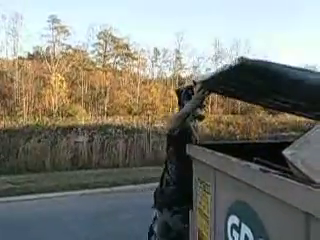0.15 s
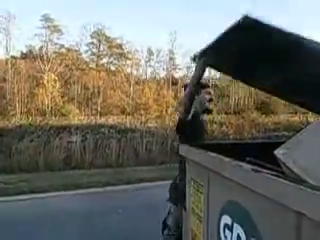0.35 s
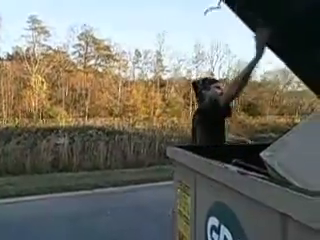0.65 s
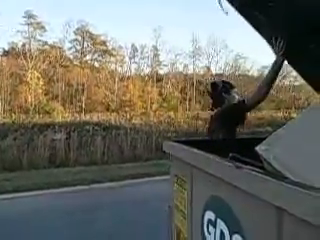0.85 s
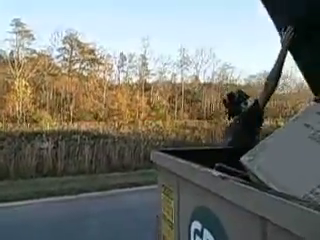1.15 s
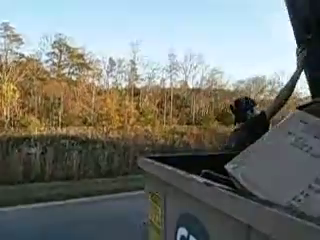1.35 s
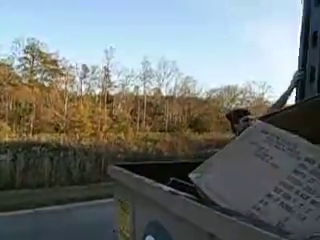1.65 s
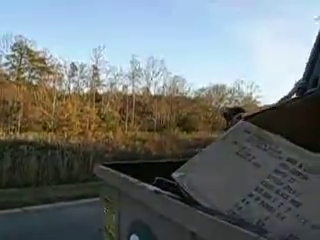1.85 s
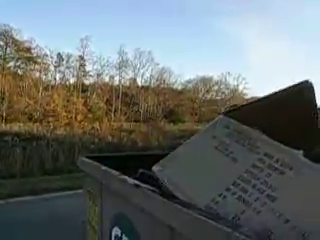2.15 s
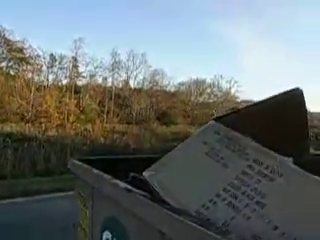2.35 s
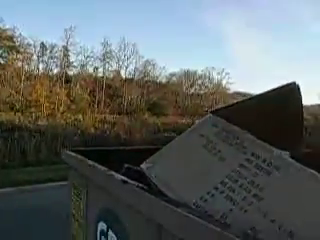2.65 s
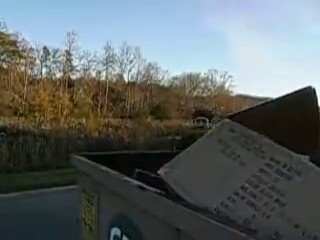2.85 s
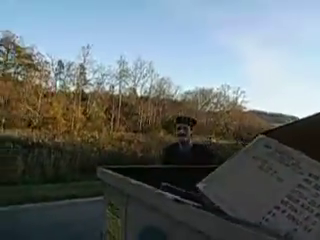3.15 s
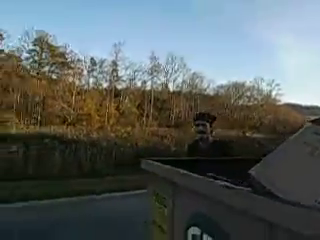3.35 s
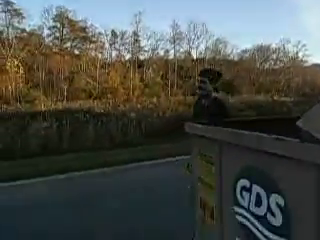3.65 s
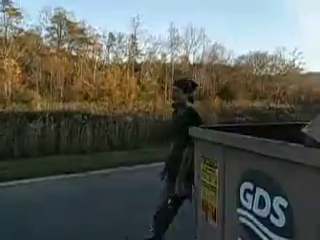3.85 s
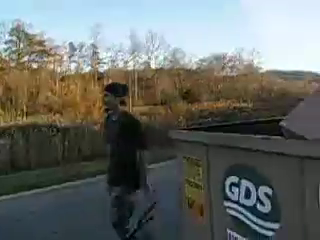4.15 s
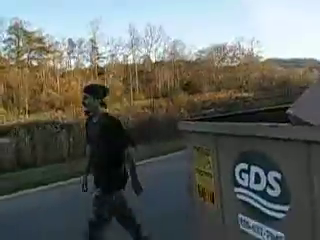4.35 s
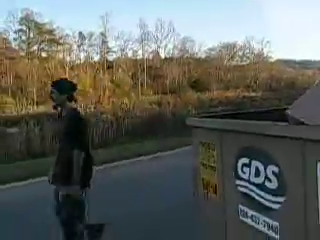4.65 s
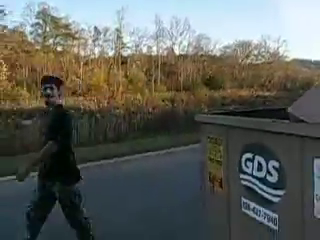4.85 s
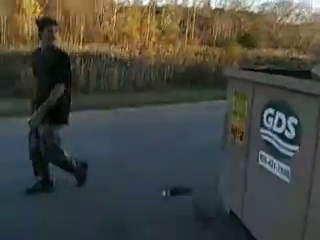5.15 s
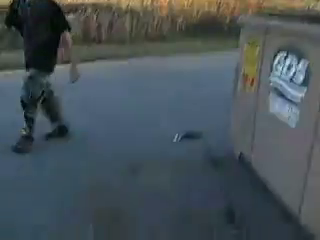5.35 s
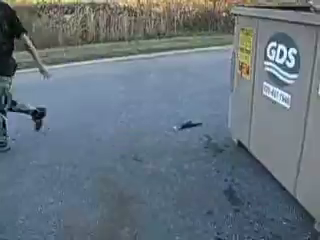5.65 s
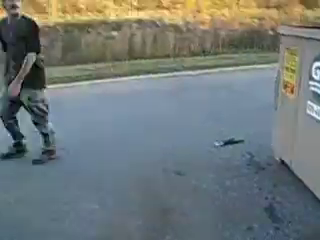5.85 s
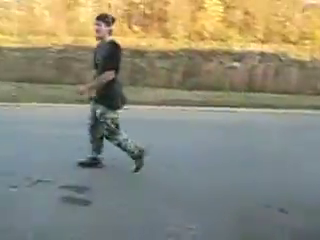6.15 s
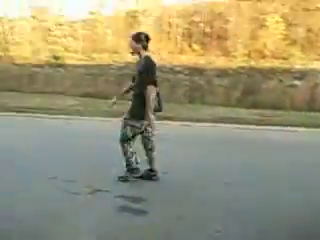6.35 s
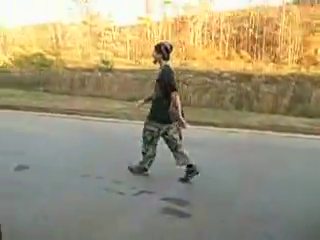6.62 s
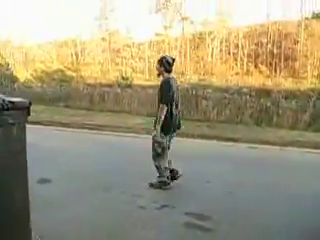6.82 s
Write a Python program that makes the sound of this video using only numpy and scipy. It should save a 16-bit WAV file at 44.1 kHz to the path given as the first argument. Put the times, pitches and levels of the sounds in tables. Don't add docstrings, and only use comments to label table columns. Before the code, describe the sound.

Outdoors by a road, shoes scrape and steel rattles as a heavy bin lid is heaved up, then it crashes over in bursts of hollow, overloaded bangs and chattering panels. After a lull a small metal piece clinks and skitters on asphalt. A knock on the microphone, soft scuffs and sharp final clangs follow. Narrow, gritty, muffled camera sound over faint traffic.

```python
import sys
import numpy as np
from scipy import signal
from scipy.io import wavfile

SR = 44100
rng = np.random.default_rng(int(sys.argv[2]) if len(sys.argv) > 2 else 0)


def file_out(sig):
    cols = np.atleast_2d(sig).T
    lim = np.clip(cols, -1, 1)
    pcm = np.round(lim * 32767).astype(np.int16)
    wavfile.write(sys.argv[1], SR, pcm)


def boost(x):
    u = np.asarray(x, float) / 20
    return 10 ** u


N = 307947


def unit(x):
    return x / np.sqrt(np.mean(x ** 2) + 1e-20)


def in_time(rows):
    time_s, level_db = np.transpose(rows)
    return boost(np.interp(np.arange(N) / SR, time_s, level_db))


def at_hz(points, hz):
    point_hz, level_db = np.transpose(points)
    return np.interp(np.log(hz), np.log(point_hz), level_db)


def above(x, hz):
    return signal.sosfilt(signal.butter(3, hz, "high", fs=SR, output="sos"), x)


def drift(rate_hz):
    r = np.exp(-80 * np.pi * rate_hz / SR)
    noise = rng.standard_normal(N // 40 + 2002)
    slow = signal.lfilter([1], [1, -2 * r, r * r], noise)[2000:]
    return np.interp(np.arange(N) / 40, np.arange(len(slow)), unit(slow))


def ring(clicks, hz, t60_s):
    r = boost(-60 / (t60_s * SR))
    w = 2 * np.pi * hz / SR
    return signal.lfilter([0, np.sin(w)], [1, -2 * r * np.cos(w), r * r], clicks + 1e-18)


def chatter(per_s, spread_db):
    sizes = boost(spread_db * np.minimum(rng.exponential(1, N), 4))
    signs = rng.choice([-1, 1], N)
    return sizes * signs * (rng.random(N) < per_s / SR)


def sheet(level, contacts, spectrum, span_hz, cycles, count):
    pitches = np.geomspace(*span_hz, count) * rng.uniform(0.906, 1.033, count)
    dealt = rng.integers(0, 4, N)

    def rings(x):
        total = 0
        for k, hz in enumerate(pitches):
            mode = ring(x * (dealt == k % 4), hz, cycles / hz)
            total = total + boost(at_hz(spectrum, hz)) * hz * mode
        return total
    return rings(contacts * level) / np.std(rings(contacts))


def swells(rows, share=1):
    t = np.arange(0, N + 16, 16) / SR
    peak_s, level_db, rise, fall = np.transpose(rows)[:, :, None]
    before = (peak_s - t) / rise.clip(.002)
    after = (t - peak_s) / fall.clip(.002)
    loss_db = 10 * np.where(t < peak_s, before, after) / share
    power = np.sum(boost(2 * (level_db - loss_db)), axis=0)
    return np.interp(np.arange(N) / SR, t, np.sqrt(power))


def add_at(out, start_s, sound):
    i = round(start_s * SR)
    out[i:i + len(sound)] += sound


# start_s, level_db (peak), pitch_hz (main ring), clank_db (relative)
LIFT_HITS = [(0.208, -23, 574, -26), (0.471, -24, 757, -13), (0.513, -19, 380, -33.5),
             (0.72, -22, 591, -10), (0.757, -12, 625, -21), (0.859, -29.5, 394, -10), (0.896, -31, 683, -3),
             (1.206, -19.5, 630, -16), (1.246, -14, 485, -14.5), (1.398, -9.5, 600, -12.5),
             (1.414, -6, 587, -11), (1.451, -13, 570, -26), (1.474, -17, 612, -18)]
TIP_HITS = [
    (1.929, -11, 760, -11.5),
    (1.947, -12, 695, -15),
    (1.972, -13, 485, -12.5),
]
CATCH_HITS = [
    (2.0985, -4, 797, -22),
    (2.1205, -4.5, 790, -19.5),
]
FALL_HITS = [(2.14, -5, 769, -12), (2.152, -7, 721, -13.5), (2.164, -7.5, 733, -22.5),
             (2.192, -12.5, 780, -19.5), (2.219, -17.5, 630, -37), (2.58, -13, 423, -27.5),
             (2.633, -11, 596, -44), (2.654, -12.5, 623, -28.5), (2.722, -19, 497, -21),
             (2.76, -4, 668, -17), (2.784, -6, 842, -17), (2.801, -11.5, 684, -17.5),
             (2.819, -8, 980, -20.5), (2.844, -12.5, 985, -26), (2.903, -9.5, 426, -29),
             (2.93, -13, 527, -36.5), (2.958, -14, 356, -29.5), (3.106, -14, 349, -40),
             (3.52, -15, 296, -28), (3.571, -37, 580, -31.5)]
HEEL_HITS = [
    (5.358, -19, 880, -11.5),
    (6.019, -19, 374, -28.5),
    (6.097, -11.5, 784, -13),
    (6.275, -1, 801, -16.5),
    (6.339, -7, 768, -8.5),
]


def all_blows():
    phases_t60_s = [(LIFT_HITS, 0.12), (TIP_HITS, 0.089), (CATCH_HITS, 0.038), (FALL_HITS, 0.089), (HEEL_HITS, 0.05)]
    return [(*row, t60_s) for rows, t60_s in phases_t60_s for row in rows]


def blows():
    out = np.zeros(N)
    t = np.arange(SR // 5) / SR
    rise_s = .0003
    for start_s, level_db, pitch_hz, clank_db, t60_s in all_blows():
        luck = rng.random((4, 24))
        near_hz = pitch_hz * 2 ** (1.1 * luck[0, 1:10] - .65)
        bright_hz = 1400 + 200 * (np.arange(14) + luck[0, 10:])
        tones = np.r_[pitch_hz, near_hz, bright_hz][:, None]
        gains = boost(np.r_[-4.0, -12.0 - 8 * luck[1, 1:10], clank_db - 8.0 - 8 * luck[1, 10:]])
        decays = np.r_[t60_s, t60_s * (.4 + .5 * luck[2, 1:10]), .015 + .02 * luck[2, 10:]][:, None]
        age = np.maximum(t - 0.002486 * luck[3, :, None], 0)
        envelope = boost(-60 * age / decays) * (1 - np.exp(-age / rise_s))
        add_at(out, start_s, -boost(level_db) * (gains @ (np.sin(2 * np.pi * tones * age) * envelope)))
    return above(out, 260)


# start_s, level_db (peak), pitch_hz, t60_s (time to fade by 60 dB)
BETWEEN_RINGS = [(1.428, -13, 713, .06), (1.43, -18.5, 1190, 0.043), (1.485, -17.5, 700, 0.056),
                 (1.955, -14.5, 448, .1), (1.985, -18.5, 399, .1), (2.004, -23, 500, .07),
                 (2.088, -16, 700, 0.045), (2.134, -19, 805, 0.045), (2.158, -16, 348, .08),
                 (2.175, -17, 588, 0.042), (2.213, -18, 646, 0.074), (2.588, -25, 1000, .06),
                 (2.596, -17.5, 518, 0.096), (2.634, -14.5, 1003, .06), (2.633, -13.5, 302, 0.061),
                 (2.644, -12.5, 429, .07), (2.661, -14, 715, .05), (2.671, -12, 352, .06),
                 (2.716, -22, 752, .1), (2.724, -19, 735, .07), (2.733, -13.5, 813, 0.056),
                 (2.734, -15, 348, .07), (2.753, -18.5, 1000, .05), (2.764, -10.5, 321, .1),
                 (2.775, -11, 878, .06), (2.794, -10.5, 1200, 0.074), (2.807, -9.5, 988, .06),
                 (2.848, -14, 299, 0.087), (2.858, -20, 980, .05), (2.904, -14.5, 1000, 0.058),
                 (2.905, -7, 560, .06), (2.917, -8.5, 559, 0.076), (2.924, -11, 260, 0.11),
                 (2.932, -11.5, 513, 0.062), (2.95, -15, 480, 0.073), (2.614, -18, 332, .07),
                 (2.685, -20, 398, .08), (2.954, -16, 298, .08), (2.97, -16, 260, 0.077),
                 (3.054, -25, 296, .07), (3.197, -20, 280, 0.076), (3.257, -22.5, 357, 0.056),
                 (3.493, -21.5, 260, 0.13), (3.516, -22.5, 602, 0.075), (3.545, -24, 394, 0.07),
                 (3.926, -26, 264, 0.046)]
MORE_RINGS = [(.483, -27, 783, 0.058), (.5, -21, 638, 0.079), (.508, -24, 512, 0.067),
              (.535, -25.5, 454, .06), (.736, -20, 620, .05), (.762, -19, 331, .08),
              (.785, -23, 452, .07), (.826, -22, 644, .06), (.862, -26.5, 1000, 0.1),
              (.885, -33, 1000, 0.11), (.908, -31, 980, .06), (.9, -26.5, 680, .1),
              (.985, -23.5, 750, .06), (3.493, -24, 1056, 0.051), (3.497, -25, 696, .06),
              (3.565, -24.5, 1050, 0.056), (3.598, -25, 900, .06), (3.57, -26, 498, .07)]
SMALL_KNOCKS = [(1.203, -36, 2390, 0.02), (1.338, -39, 2400, .025), (1.415, -15.5, 1100, .06),
                (1.452, -20, 1294, 0.046), (.722, -38, 2490, 0.024), (.757, -34.5, 2420, 0.0294),
                (.846, -22, 643, 0.036), (2.193, -17, 810, .03), (4.7815, -11.5, 2737, 0.032),
                (4.3665, -18.5, 2680, 0.027), (2.828, -15, 802, 0.042), (2.85, -16, 450, 0.046),
                (1.94, -15.5, 905, 0.054), (2.145, -13, 1057, .07), (3.871, -37, 3520, 0.0094),
                (4.027, -30, 1740, .02), (4.165, -26, 802, .07), (4.2, -26, 1000, .05),
                (4.25, -27.5, 1000, .04), (4.66, -20, 1080, 0.044), (4.782, -24.5, 1600, .02),
                (5.335, -23.5, 347, 0.089), (6.099, -15, 644, 0.031), (6.109, -20, 745, 0.033),
                (6.015, -27, 448, 0.047), (1.398, -23.5, 2476, .025), (1.413, -19.5, 2480, 0.032),
                (4.111, -23, 910, 0.053), (4.244, -28, 301, 0.048), (4.315, -17.5, 99.3, 0.1194),
                (4.316, -18, 1054, 0.054), (4.414, -29.5, 2700, .025), (4.431, -23, 1050, 0.041),
                (4.482, -33, 2600, .015), (5.36, -26, 500, 0.046), (6.28, -13.5, 790, 0.016),
                (6.2861, -14.5, 805, 0.045), (6.34, -14, 160, 0.062), (6.343, -10, 1198, .025),
                (6.354, -15.5, 780, .04), (6.352, -28.5, 3040, .05), (6.28, -17.5, 1270, 0.028),
                (6.279, -19.5, 2210, .03), (6.34, -20.5, 3000, 0.018), (6.342, -21, 2090, .02),
                (6.385, -21, 746, .03)]


def panel_rings():
    out = np.zeros(N)
    t = np.arange(SR // 6) / SR
    rise_cycles, twin_ratio, twin_db = 1.1, 1.09, -8.5
    for start_s, level_db, hz, t60_s in list(BETWEEN_RINGS) + list(MORE_RINGS) + list(SMALL_KNOCKS):
        swell = 1 - np.exp(-t * hz / rise_cycles)
        main = np.sin(2 * np.pi * hz * t)
        twin = boost(twin_db) * np.sin(2 * np.pi * twin_ratio * hz * t)
        fade = boost(level_db + 2.0 - 60 * t / np.clip(t60_s, .01, .2))
        add_at(out, start_s, -fade * swell * (main + twin))
    return out


def aftershake():
    out = np.zeros(N)
    t = np.arange(SR // 3) / SR
    for start_s, level_db, _, _, t60_s in all_blows():
        add_at(out, start_s, boost(level_db - 9.5 - 60 * t / (1.59 * t60_s)))
    return out


# peak_s, level_db (panels), rise and fall (s per 10 dB), clank_db (edges, relative)
HEAVES = [(0.198, -29.5, -0.27, -0.5, -11), (0.49, -33, 0.1, -0.23, -11), (0.725, -29, -0.3, 0.13, -11),
          (0.856, -22, 0.02, 0.01, -6), (0.96, -28, 0.13, 0.07, -21), (1.256, -32, 0.03, 0.1, -3),
          (1.402, -33, 0.2, -0.13, -0.5), (1.932, -27, -0.0056, 0.0065, 14), (1.95, -17.5, 0, 0.1029, 0),
          (2.085, -25, 0, 0, -5), (2.15, -18.5, 0.0056, 0.0461, -5.5), (2.39, -27.5, 0.25, 0.05, -25),
          (2.582, -24, -0.04, 0.11, -14), (2.64, -21.5, -0.02, 0.05, -16),
          (2.73, -17.5, 0.05, -0.03, -14.5), (2.8, -11, 0.0344, 0.03, -3),
          (2.908, -17, 0.0541, 0.0159, -13.5), (3.112, -32, 0, -0.06, -15),
          (3.328, -30.5, 0.26, -0.44, -10.5), (3.51, -25, 0, 0.08, -14)]
DROPS_AND_KICKS = [(4.028, -35, 0.23, -0.42, -2), (4.12, -27.5, -0.25, 0.15, -16),
                   (4.225, -36.5, 0.5, 0, -2.5), (4.316, -30, -0.06, 0.08, 7.5),
                   (4.654, -35, -0.15, 0.28, -1.5), (5.352, -28, 0, 0, -15), (6.02, -38.5, 0.1, -1.1, -6.5),
                   (6.1, -39, 0.26, -0.3, 8.5), (6.29, -36.5, 0.23, 0.5, 9), (6.387, -26.5, 0.0559, 0.04, 9)]
# peak_s, level_db, rise and fall (s per 10 dB)
BOX_THUDS = [(.8, -33.5, 0, 0), (1.256, -31, -0.13, -0.07), (2.652, -24.5, -0.08, 0.33),
             (2.9, -16, 0.05, 0.07), (2.95, -19, 0.02, 0.05), (3.06, -23.5, 0.1, 0.2),
             (3.222, -30.5, 0, 0.28), (4.03, -31, 0.36, 0), (4.312, -26.5, 0.08, 0.15),
             (6.348, -26.5, -0.15, -0.96)]


def shudder():
    peak_s, level_db, rise, fall, clank_db = np.transpose(list(HEAVES) + list(DROPS_AND_KICKS))
    jiggle_db, boom_db = -42, -9.5
    panel = np.hypot(swells(np.c_[peak_s, level_db, rise, fall]), boost(jiggle_db))
    clank = swells(np.c_[peak_s, level_db + clank_db, rise, fall], share=0.45)
    boom = np.hypot(boost(boom_db) * panel, swells(BOX_THUDS))
    return panel, clank, boom


# pitch_hz, level_db (per Hz)
PANEL_COLOUR = [(100, -40.5), (170, 0.5), (463, 3.5), (730, 6), (793, 2), (860, 8.5), (909, -4.5),
                (1100, -7.5), (1500, -25.5), (1950, -47.5), (3300, -120)]
EDGE_COLOUR = [(820, -24.5), (1400, 4), (1750, -9), (1880, -3), (2180, -9), (3710, -20.5), (4160, -18),
               (5410, -51), (9150, -120)]
# pitch_hz, level_db, t60_s
BOX_MODES = [
    (51, -6.5, .3),
    (59.9, 3, 0.59),
    (92, 1.5, 0.17),
    (118.3, -8.5, 0.29),
    (166.7, 2.5, 0.052),
]


def bin_rattle():
    panel, clank, boom = shudder()
    panel = np.hypot(panel, aftershake())
    panels = sheet(panel, chatter(6000, spread_db=1.5), PANEL_COLOUR, (180, 1500), cycles=19.0, count=24)
    edges = sheet(clank, chatter(6000, spread_db=3.5), EDGE_COLOUR, (1250, 4300), cycles=8.2, count=20)
    box = 0
    for hz, level_db, t60_s in BOX_MODES:
        push = rng.standard_normal(N)
        box = box + boost(level_db) * ring(push * boom, hz, t60_s) / np.std(ring(push, hz, t60_s))
    return boost(-2.5) * above(panels, 186) + boost(-8.5) * above(edges, 1300) + boost(-12.0) * box


# peak_s, level_db, rise and fall (s per 10 dB)
GRINDS = [(1.413, -36, 0.05, 0.015), (1.915, -31, .006, 0.02), (1.931, -20, -0.0035, 0.01),
          (1.972, -32, 0.0155, 0.0253), (2.122, -32, 0.03, -0.01), (2.145, -26, .004, 0.0231),
          (2.766, -29.5, -0.02, 0.03), (2.8, -27, 0.01, 0.02), (2.842, -30.5, 0.01, 0.02),
          (2.91, -39.5, .006, 0.05), (4.335, -30.5, .005, 0.02), (4.66, -31.5, -0.08, 0),
          (.06, -40.5, -0.15, 0.17), (4.385, -25, 0.02, 0.01), (5.7, -44.5, 0.16, 0.1),
          (6.46, -42.5, -0.07, 0.15), (4.438, -33, 0.0156, .015), (4.79, -34, -0.01, 0.05),
          (6.31, -34, 0.04, .04), (6.38, -26, 0.1, -0.5)]
# pitch_hz, level_db (per Hz)
GRIND_COLOUR = [(1200, -7.5), (1900, 0), (2800, 0), (3600, -1), (4300, -2.5)]


def rasps():
    contacts = chatter(14000, spread_db=1.5)
    return above(sheet(swells(GRINDS), contacts, GRIND_COLOUR, (1400, 4400), cycles=4.1, count=12), 1100)


# centre_s, level_db, pitch_hz, length_s
HINGE_SQUEAKS = [(0.11, -44, 1673, 0.04), (0.842, -43, 2120, 0.057), (0.9, -39.5, 1730, .02),
                 (0.962, -44, 2260, 0.023), (0.963, -46, 1760, 0.018), (1.09, -46, 1750, 0.017),
                 (5.51, -48, 2400, 0.037), (5.98, -47, 2430, 0.017), (6.333, -25.5, 1630, 0.021),
                 (6.368, -19.5, 1590, 0.016), (6.38, -21.5, 2014, 0.008)]


def squeaks():
    t = np.arange(N) / SR
    phase = 2 * np.pi * np.cumsum(1 + 0.02 * drift(41)) / SR
    out = np.zeros(N)
    for centre_s, level_db, hz, length_s in HINGE_SQUEAKS:
        swell = np.exp(-np.abs((t - centre_s) / (length_s / 2)) ** 4.3)
        out += boost(level_db) * swell * np.sin(hz * phase)
    return boost(3.4 * drift(210)) * out


# pitch_hz, level_db, t60_s
SCRAP_MODES = [(1000, -5, 0.087), (1080, -3, 0.07), (1575, -35, .03), (2000, -14.5, 0.0169),
               (2330, -1, 0.013), (2390, 0.5, 0.0642), (2600, -5, 0.093), (2708, 3.5, 0.081),
               (3000, -6, 0.032), (2990, 3.5, 0.076), (3220, -9.5, 0.0076), (3000, 13, 0.0068),
               (3330, 0, 0.035), (3350, -1.5, 0.054), (3573, -1, 0.12), (4030, 0, 0.032), (3770, 3, 0.051),
               (4330, 0.5, 0.018)]
# start_s, level_db (peak), bright_hz (brightest ring), low_db (low ring, relative), share (of ring time)
SCRAP_BOUNCES = [(4.026, -20.5, 2900, -29, 0.2), (4.0965, -36, 2500, 10, 0.75),
                 (4.224, -22.5, 3700, -13, 0.16), (4.3145, 2.5, 3220, -15, .3), (4.3309, -5, 3480, -16, .6),
                 (4.3372, -17, 2990, -6, .7), (4.346, -7, 2780, -9, .6), (4.364, -4.5, 2710, -17, .65),
                 (4.378, -12.5, 3520, -19, .35), (4.383, -14.5, 2700, -18.5, .3),
                 (4.3883, -13.5, 2800, -13, .45), (4.3956, -16, 2690, -9, 0.57),
                 (4.4242, -10, 2960, -11, .4), (4.433, -25, 3190, -9, 0.7), (4.4605, -13, 2760, -28.5, 0.2),
                 (4.4735, -21, 3500, -9, 0.15), (4.483, -27, 2700, -8, .15), (4.6556, -8, 3030, -16.5, 0.3),
                 (4.761, -22.5, 3160, -1, 0.5), (4.7829, -15, 2600, -14.5, .35),
                 (4.792, -20, 2920, -7.5, 0.39), (4.814, -22, 3000, -14, .5)]


def scrap():
    out = np.zeros(N)
    t = np.arange(SR // 8) / SR
    hz, mode_db, t60_s = np.transpose(SCRAP_MODES)
    focus_db = 18
    for start_s, level_db, bright_hz, low_db, share in SCRAP_BOUNCES:
        luck = rng.random((2, len(hz)))
        near_db = np.where(hz < 1300, low_db + 5.5, -6.0 - focus_db * np.abs(np.log2(hz / bright_hz)))
        age = np.maximum(t - 0.000922 * luck[0, :, None], 0)
        fade = boost(-60 * age / (share * t60_s[:, None]))
        gains = boost(level_db + mode_db + near_db - 13.3 * luck[1])
        add_at(out, start_s, gains @ (np.sin(2 * np.pi * hz[:, None] * age) * fade))
    return out


def cracks():
    out = np.zeros(N)
    for start_s, level_db, bright_hz, *_ in SCRAP_BOUNCES:
        click = np.zeros(400)
        click[0] = boost(level_db - 8.0)
        add_at(out, start_s, ring(click, 1.4 * bright_hz, 0.0048))
    return out


# peak_s, level_db, rise and fall (s per 10 dB)
SOLE_SCUFFS = [(.08, -33.5, 0, 0.06), (.045, -37, -0.1, 0.07), (.2, -39.5, 0.3, 0.1),
               (4.385, -31, 0.05, 0.0357), (4.425, -35.5, 0.08, 0.04), (4.675, -52.5, 0.3, -0.2),
               (4.782, -39, 0.06, 0.04), (5.39, -46.5, 0.28, 0.13), (5.662, -43, 0.06, 0),
               (5.87, -43.5, 0.12, -0.04), (6.265, -46.5, -0.06, -0.15), (6.34, -27.5, 0.0455, -0.06),
               (6.387, -29.5, 0.0765, -0.06), (6.458, -47, -1.15, 0.26)]
# pitch_hz, level_db (per Hz)
GRIT_COLOUR = [(1800, -23.5), (2300, -9), (3000, 5), (3600, -8.5), (4200, -10.5)]


def scuffs():
    grains = chatter(6000, spread_db=3.0)
    grit = sheet(swells(SOLE_SCUFFS), grains, GRIT_COLOUR, (1900, 4300), cycles=17.0, count=16)
    return boost(-2.5) * above(grit, 1500)


def camera_tap():
    tap_s, tap_db = 5.4762, 6
    t = np.arange(N) / SR - tap_s
    swing = np.interp(t, [0, .0003, .0018, .003, .0072, .0085, .015, .0165, .019, .026],
                      [0, -.8, -.45, .1, .25, 0, -.01, .07, -.05, 0])
    buzz = unit(above(rng.standard_normal(N), 1200))
    buzz_gain = 0.26 * np.interp(t, [.0015, .003, .005, .007], [0, 1, 1.0, 0], 0, 0)
    return boost(tap_db) * (swing + buzz_gain * buzz)


# time_s, level_db
WALL_HUM_LEVEL = [(0.0, -37.5), (0.64, -28), (1.3, -34), (2.2, -42.5), (3.5, -35.5), (4.2, -49), (6.98, -47)]


def drone():
    once = ring(rng.standard_normal(N), 250, 0.028)
    level = np.hypot(in_time(WALL_HUM_LEVEL), boost(-2) * swells(BOX_THUDS))
    return boost(-6.5) * level * unit(ring(once, 250, 0.028))


# pitch_hz, level_db (per Hz)
TRAFFIC_COLOUR = [(16, -34), (28, -4.5), (43, -14.5), (142, -10.5), (193, -15), (222, -16), (401, -18),
                  (472, -20.5), (555, -16.5), (981, -16.5), (1730, -40), (2710, -37), (3600, -41.5),
                  (4680, -72), (7920, -120)]


def traffic():
    out = 0
    together = drift(1.5)
    edges_hz = 22 * 2 ** np.arange(0, 8, 1 / 3)
    white = rng.standard_normal((2, N + SR))
    for k, (low, high) in enumerate(zip(edges_hz, edges_hz[1:])):
        band_filter = signal.butter(2, [low, high], "band", fs=SR, output="sos")
        band = signal.sosfilt(band_filter, white[k % 2])[SR:]
        colour_db = at_hz(TRAFFIC_COLOUR, min(np.sqrt(low * high), 3600))
        out = out + band * boost(colour_db + together / 2 + 2.1 * drift(6))
    return boost(-35.5) * unit(out)


def scene():
    near = blows() + panel_rings() + bin_rattle() + rasps() + squeaks() + scrap() + cracks() + scuffs()
    far = camera_tap() + drone() + traffic()
    for lag_s, echo_db in [(.0045, -25), (.017, -20.5)]:
        near = near + boost(echo_db) * np.r_[np.zeros(int(lag_s * SR)), near][:N]
    return (near + far)[None]


def converter(x):
    camera_hz = 8000
    common = np.gcd(SR, camera_hz)
    up, down = SR // common, camera_hz // common
    taps = signal.firwin(24 * up + 1, 4500, window=("kaiser", 6), fs=SR * down)
    low = signal.resample_poly(x, down, up, axis=1, window=taps)
    low = np.clip(low, -.47, 0.25)
    return signal.resample_poly(low, up, down, axis=1, window=taps)[:, :N]


def band_limit(x):
    return signal.sosfilt(signal.butter(12, 16500, fs=SR, output="sos"), x)


def record(dry):
    since_s = np.arange(N) / SR - 5.4762 - .009
    ducked = dry * boost(-9.0 * (since_s > 0) * np.exp(-np.abs(since_s) / 0.024))
    held = converter(ducked)
    held = held + 0.12 * signal.lfilter(*signal.iirpeak(3260, 1.5, fs=SR), held)
    cutoff_hz, offset, ceiling, knee = 3932, .4654, .714, 0.0081
    taps = signal.firwin(141, cutoff_hz, window=("kaiser", 8), fs=SR)
    narrow = signal.fftconvolve(held, taps[None], "same") + offset
    rounded = ceiling - knee * np.logaddexp(0, (ceiling - narrow) / knee)
    return band_limit(rounded)


dry = scene()
out = record(dry)
file_out(out)
```